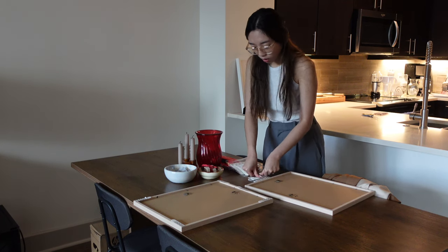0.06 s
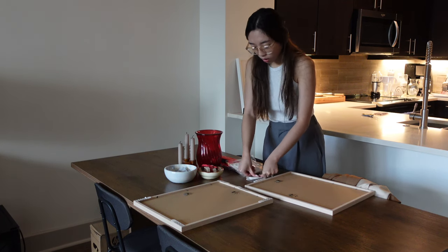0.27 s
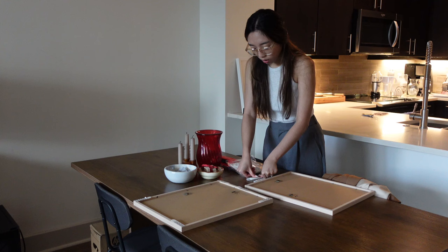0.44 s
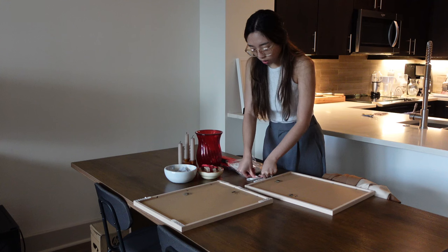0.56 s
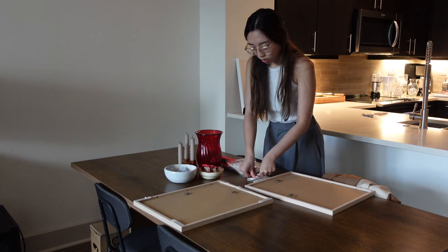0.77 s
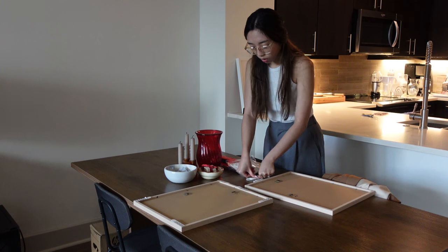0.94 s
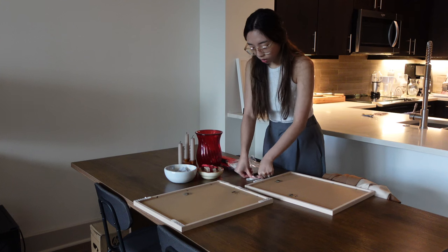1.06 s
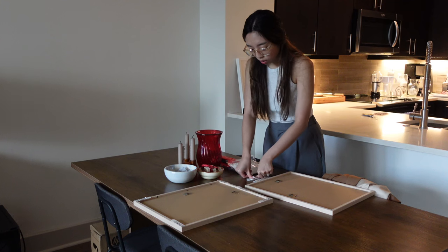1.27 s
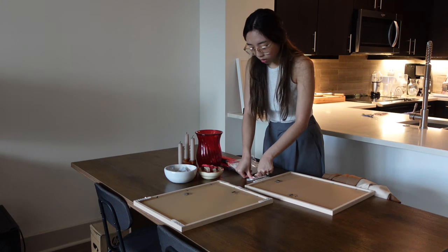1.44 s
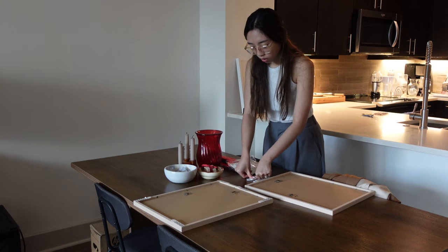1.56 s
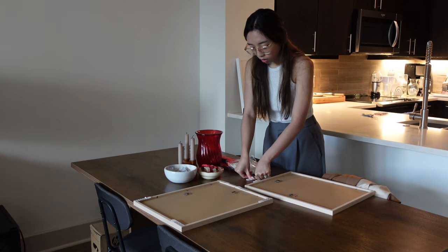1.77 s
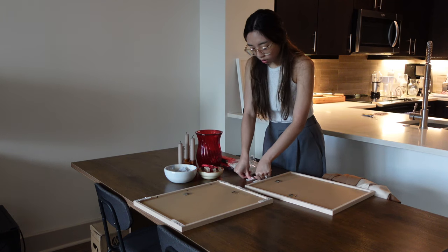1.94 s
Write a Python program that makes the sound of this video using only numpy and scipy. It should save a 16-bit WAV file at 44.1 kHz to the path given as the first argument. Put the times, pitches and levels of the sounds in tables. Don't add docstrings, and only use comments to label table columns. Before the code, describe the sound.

Plastic hook strips are pressed together on a wooden table, giving crisp single snaps, short dense crackles and light finger knocks, about two metres from the microphone in an echoing kitchen over a soft, steady hum.

```python
import sys
import numpy as np
from scipy import signal
from scipy.fft import rfft, irfft
from scipy.io import wavfile

SR = 44100
rng = np.random.default_rng(int(sys.argv[2]) if len(sys.argv) > 2 else 0)


def level_to_linear(level):
    exponent = np.asarray(level, float) / 20
    return 10 ** exponent


def wav_out(sig):
    wavfile.write(sys.argv[1], SR, np.round(np.clip(np.atleast_2d(sig).T, -1, 1) * 32767).astype(np.int16))


N = 88640
LEAD = 8192


def along(table, hz, axis):
    rows = np.array(table)
    return np.interp(np.log(np.maximum(hz, 1)), np.log(rows[:, 0]), rows[:, axis])


def ring(t, hz, decay_s):
    age = t / np.maximum(decay_s, 1e-5)
    return -np.sin(2 * np.pi * hz * t) * age * np.exp(1 - age)


def place(start_s, shape):
    grain = 640
    at = np.maximum(start_s * SR + LEAD, 0)
    first = np.ceil(at).astype(int)
    spot = first + np.arange(grain)
    sound = shape((spot - at) / SR)
    return np.bincount(spot.ravel(), sound.ravel(), N + LEAD + grain)[:N + LEAD]


def hum():
    # pitch_hz, level_db (per Hz), side_db
    hum_bands = [(30, -38, -4), (66, -26, 1), (134, -1, -9), (238, 0, -8), (450, -2, -9), (1200, -7, -5),
                 (4000, -14.5, -13), (15100, -27, -25)]
    level_db, flicker_db = -45, .6
    hz = np.arange(N // 2 + 1) * SR / N
    side_gain = level_to_linear(along(hum_bands, hz, axis=2))
    gain = level_to_linear(along(hum_bands, hz, axis=1)) * np.array([np.ones(len(hz)), side_gain])
    both = irfft(rfft(rng.standard_normal((2, N))) * gain, N)
    waver = np.interp(np.arange(N), np.linspace(0, N, 16), rng.standard_normal(16))
    return both * level_to_linear(level_db + flicker_db * waver) / both[0].std()


def let_go(rows, chance, ring_s):
    overtone_db, overtone_s = 1.5, .000045
    fizz_s, knock_s = .00005, .00007
    fizz_hz = 12020 * (1 + .04 * chance[:, :1])
    knock_hz = 3380 * (1 + .1 * chance[:, 1:2])
    start_s, peak_db, stem_hz, fizz_db, knock_db = np.array(rows, float).T[:, :, None]

    def snap(t):
        stem = ring(t, stem_hz, ring_s)
        overtone = level_to_linear(overtone_db) * ring(t, stem_hz * 1.43, overtone_s)
        fizz = level_to_linear(fizz_db) * ring(t, fizz_hz, fizz_s)
        tick = level_to_linear(knock_db + 1) * ring(t, knock_hz, knock_s)
        return level_to_linear(peak_db) * (stem + overtone + fizz + tick)

    return place(start_s, snap)


def single_snaps():
    # start_s,
    # peak_db, stem_hz, fizz_db, knock_db
    snap_rows = [(.4044, -16.5, 6050, -4, -1), (.4886, -22, 5300, 5.5, -6), (.5894, -18, 7000, 2.5, -29),
                 (.6130, -16.5, 7160, -17, -30), (.6244, -18.5, 6260, -3, -26), (.6301, -18, 6100, 1, -32),
                 (.6355, -14, 6500, -1, -13), (.976, -20, 5100, -1.5, -16), (1.2663, -24.5, 8160, -4, -8),
                 (1.2744, -18.5, 6460, 2, -26.5), (1.6431, -26, 4000, -1, -7), (1.6668, -24, 5870, -17, -7),
                 (1.7152, -33, 6100, 1, 1), (1.7302, -20, 5740, 0, -18), (1.8331, -14.5, 7660, -6, -30),
                 (1.8419, -18.5, 7250, -9, -18), (1.928, -21.5, 5700, -7, -12),
                 (-.06, -6, 6090, -11, -5.5), (.285, -14.5, 6500, 3, -13), (0.2908, -6.5, 6050, -4.5, -10),
            (0.3056, -11, 5240, 7, -26), (0.6422, -1.5, 8600, -11, -14), (0.6443, -4, 7650, -8, -16),
            (0.6471, -10.5, 5100, -20, -4), (0.664, -13.5, 5230, 14.5, 1.5), (1.0156, -1, 5710, -2, -24),
            (1.016, -13.5, 6400, -14, -24), (1.3054, -6.5, 6400, -14, -23), (1.3072, 1.5, 6800, -14, -24),
            (1.3178, -17, 6700, -18, -36), (1.376, -11, 8700, 7, -7), (1.4207, -5.5, 6800, -19, -1.5),
            (1.4295, -19, 6000, 6.5, -16), (1.741, -8, 5930, -9, -7.5), (1.8464, -14, 7240, -1, -13),
            (1.8493, -4.5, 7300, -9, -19), (1.8603, -11.5, 4500, -3, 1)]
    rows = np.array(snap_rows)
    return let_go(rows, rng.standard_normal((len(rows), 2)), ring_s=.00009)


def room():
    # delay_ms, level_db, dulling (0-1), side_share
    echoes = [
        (0.965, -12, 0.53, 0.029),
        (5.825, -5, 0, 0.18),
        (8.04, -9, 0.6, -0.074),
        (10.89, -8.5, 0, -0.027),
        (16.89, -8.5, 0.4, -.2),
        (21.32, -6.5, 0.11, .2),
        (24.36, -14, 0, 0.12),
    ]
    # centre_hz, t60_s, level_db, side_db
    tail_bands = [(300, 0.99, -49.5, -16), (800, 0.53, -28.5, -11), (2000, 0.78, -28.5, -21),
                  (4500, 0.63, -28, -24), (7000, 0.55, -26.5, -35), (9800, 0.42, -26, -25),
                  (14700, 0.3, -33, -39)]
    length = 40000
    thin_hz = 1600
    scatter_db, scatter_s = -24, .0037
    rise_s = .008
    t = np.arange(length) / SR
    hz = np.arange(length // 2 + 1) * SR / length

    early = np.array([[1.], [0.]]) * np.ones(len(hz), complex)
    thin = hz / np.hypot(hz, thin_hz)
    for delay_ms, level_db, dulling, side in echoes:
        gain = thin * level_to_linear(level_db - 20 * dulling * (hz / 1e4) ** 2)
        delay = np.exp(-2j * np.pi * hz * delay_ms / 1000)
        early = early + np.array([[1.], [side]]) * gain * delay

    noise = rng.standard_normal((2, length))
    smear = noise[0] * np.exp(-t / scatter_s) * (t > .0003)
    out = irfft(early * (1 + level_to_linear(scatter_db) * rfft(smear)))
    for centre in 150 * 2 ** (np.arange(15) / 2):
        share = np.clip(1 - 2 * np.abs(np.log2(np.maximum(hz, 1) / centre)), 0, 1)
        decay = 1000. ** (-t / along(tail_bands, centre, axis=1))
        rise = (1 - np.exp(-t / rise_s)) ** 2
        fade = level_to_linear(along(tail_bands, centre, axis=2)) * decay * rise
        width = np.array([[1], [level_to_linear(along(tail_bands, centre, axis=3))]])
        out = out + irfft(rfft(noise) * share) * fade * width
    return out


def knocks():
    # start_s, peak_db, wood_hz
    knock_rows = [(0.2818, -39, 2000), (0.378, -27, 1200), (.4000, -27, 1080), (.6410, -20.5, 520),
                  (.6632, -25.5, 490), (.6900, -22, 530), (.7000, -20.5, 2170), (.6950, -26, 1010),
                  (1.017, -33, 1290), (1.308, -15, 2060), (1.379, -26.5, 1200), (1.4227, -36, 1730),
                  (1.424, -20.5, 1340), (1.4650, -30.5, 1550), (1.6428, -23, 2040), (1.6657, -29.5, 1360),
                  (1.7405, -23.5, 1240), (1.8603, -15.5, 2050), (1.86, -24.5, 450)]
    swell_cycles = .55
    start_s, peak_db, wood_hz = np.array(knock_rows).T[:, :, None]
    return place(start_s, lambda t: level_to_linear(peak_db) * ring(t, wood_hz, swell_cycles / wood_hz))


def rolls():
    # start_s, length_s, level_db, stem_hz, other_stem_hz
    roll_rows = [
        (0.649, 0.05, -13, 5150, 8180),
        (0.736, 0.013, -19.5, 4900, 7560),
        (1.3120, .062, -14.5, 6540, 6450),
        (1.331, 0.056, -17.5, 8700, 4940),
        (1.387, 0.073, -24, 6100, 4800),
        (0.351, 0.043, -33.5, 5093, 7000),
    ]
    count, per_s = 80, 600
    scatter_db, fade_db = 3, -2.5
    pitch_spread = .057
    fizz_db, knock_db = np.full(count, -14), np.full(count, -9.5)
    out = 0
    for start_s, length_s, level_db, stem_hz, other_hz in roll_rows:
        u, g = rng.random((count, 3)), rng.standard_normal((count, 3))
        where_s = (np.arange(count) + u[:, 0]) / per_s
        size_db = level_db + fade_db * where_s / length_s - scatter_db * np.log(u[:, 1])
        size_db = size_db - 99 * np.clip((where_s - length_s) / .02, 0, 1)
        pitch_hz = np.where(u[:, 2] < .5, stem_hz, other_hz) * (1 + pitch_spread * g[:, 2])
        rows = np.c_[start_s + where_s, size_db - 6, pitch_hz, fizz_db, knock_db]
        out = out + let_go(rows, g, ring_s=.00027)
    return out


def scene():
    radiates_hz = 324
    strip = single_snaps() + knocks() + rolls()
    strip = signal.sosfilt(signal.butter(4, radiates_hz, "high", fs=SR, output="sos"), strip)
    in_room = signal.fftconvolve(strip[None], room(), axes=1)[:, LEAD:LEAD + N]
    mid, side = in_room + hum()
    return np.array([mid + side, mid - side])


def low_pass(x):
    return signal.sosfilt(signal.butter(12, 16990, fs=SR, output="sos"), x)


def record(dry):
    ceiling, top_hz = .9, 15800
    soft = ceiling * np.tanh(dry / ceiling)
    mix = signal.sosfilt(signal.ellip(8, .2, 40, top_hz, fs=SR, output="sos"), soft)
    return low_pass(mix)


dry = scene()
out = record(dry)
wav_out(out)
```